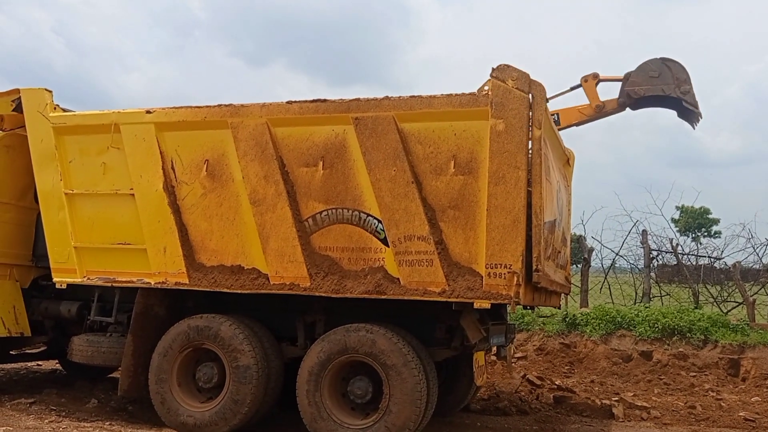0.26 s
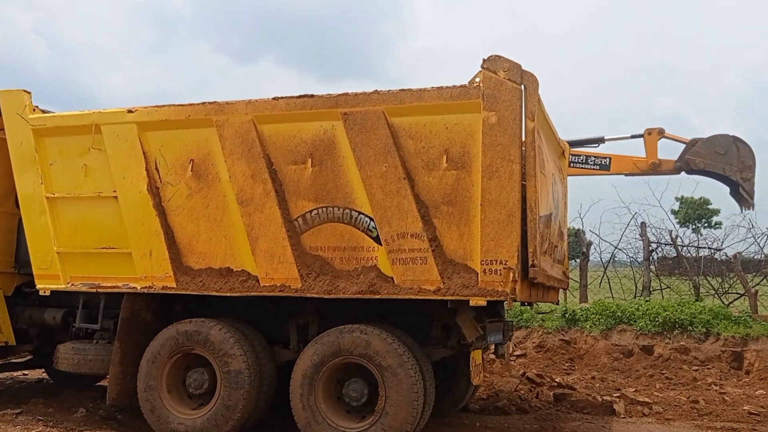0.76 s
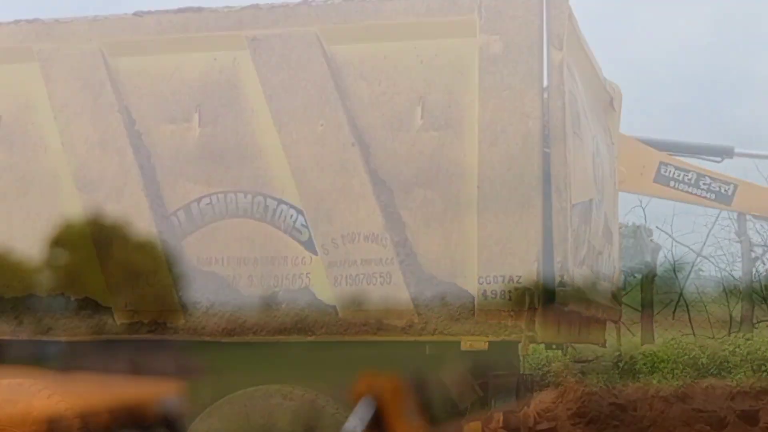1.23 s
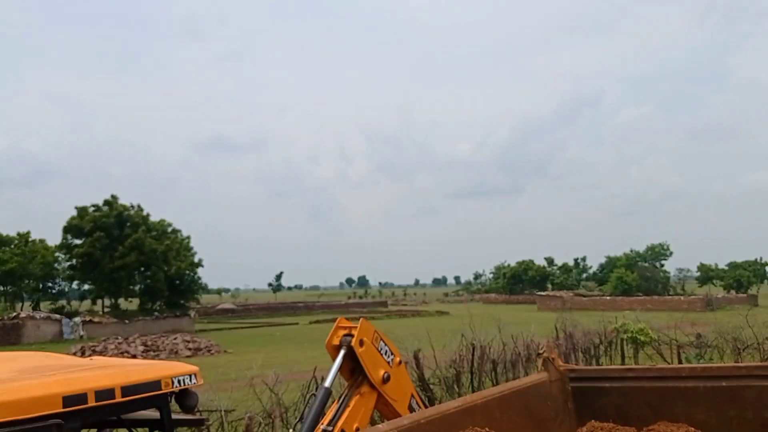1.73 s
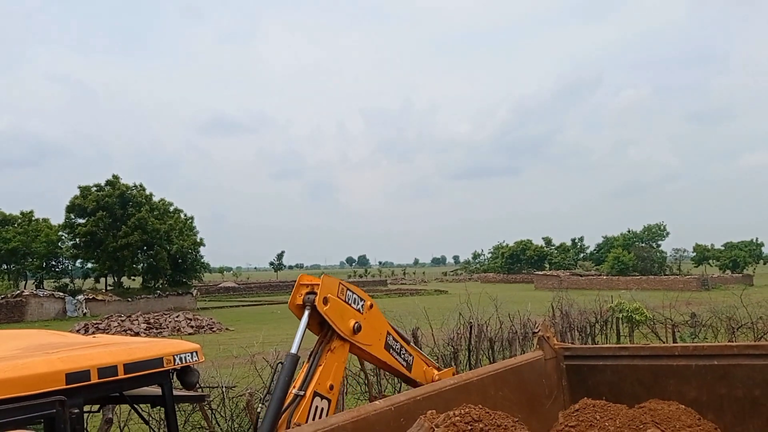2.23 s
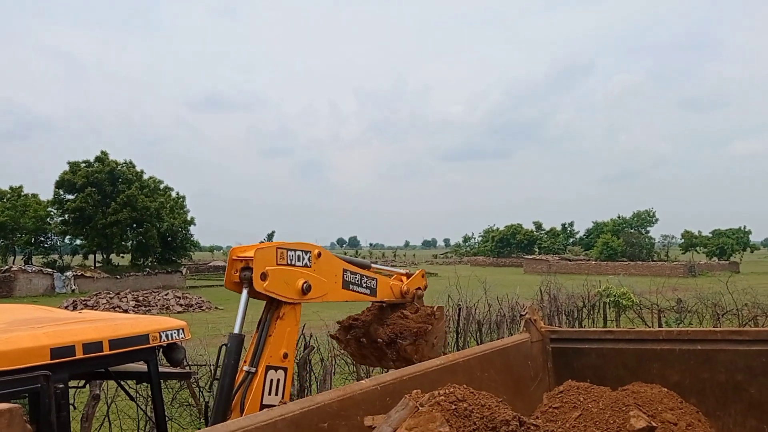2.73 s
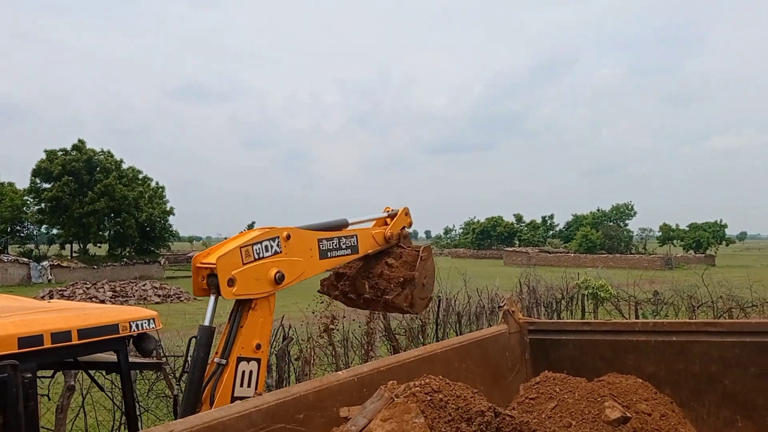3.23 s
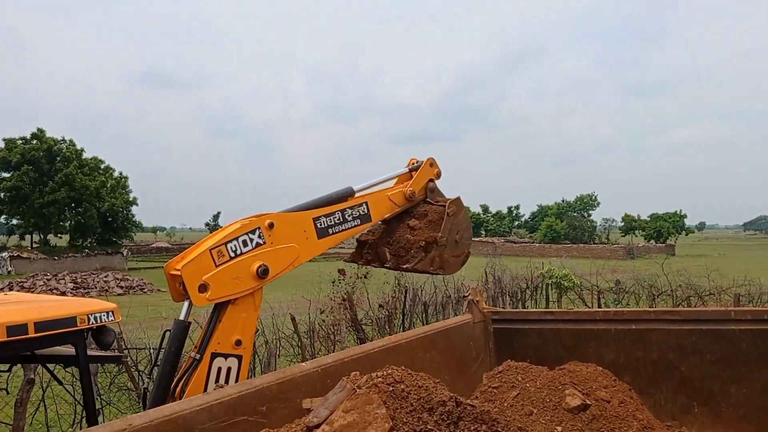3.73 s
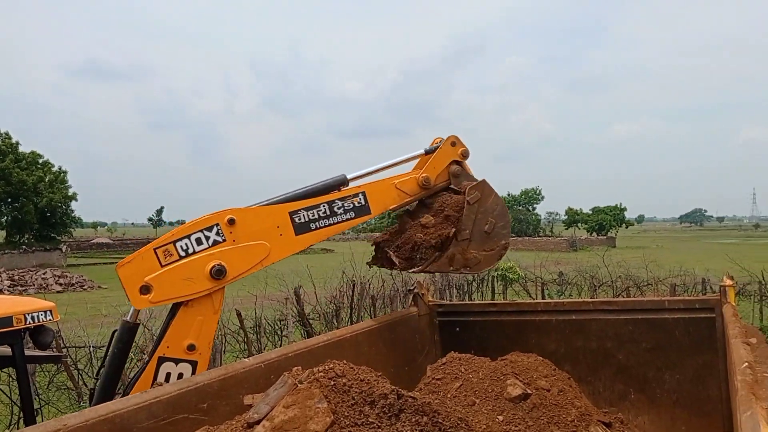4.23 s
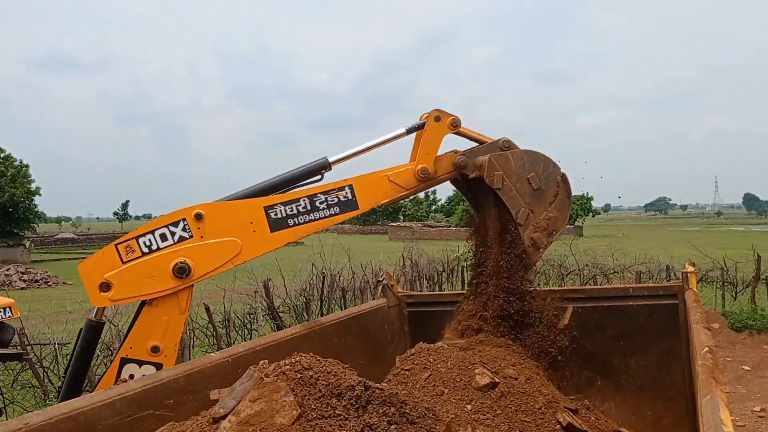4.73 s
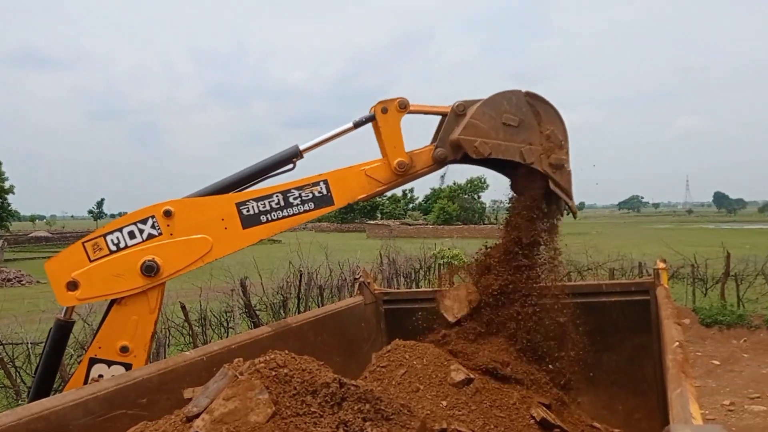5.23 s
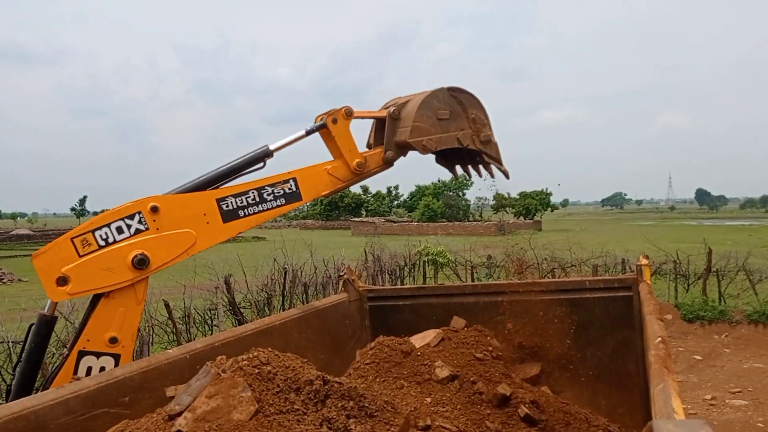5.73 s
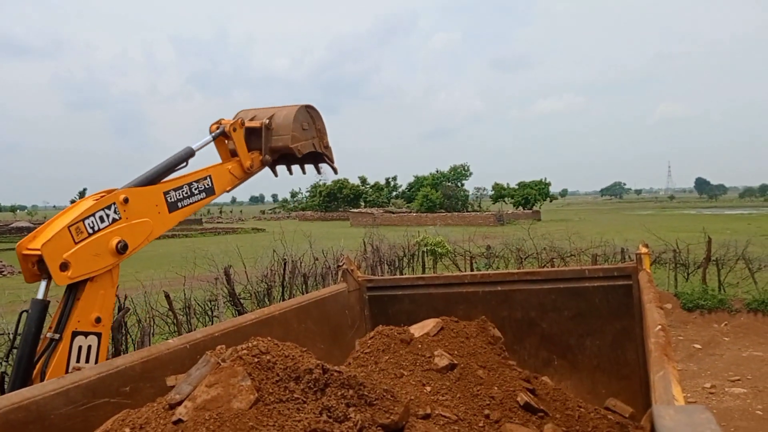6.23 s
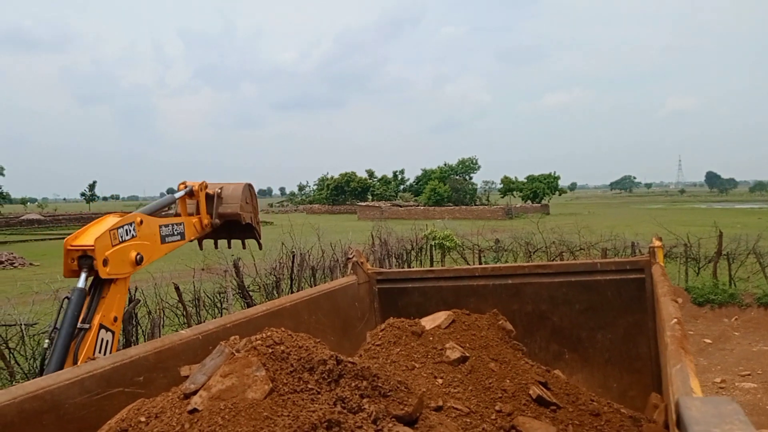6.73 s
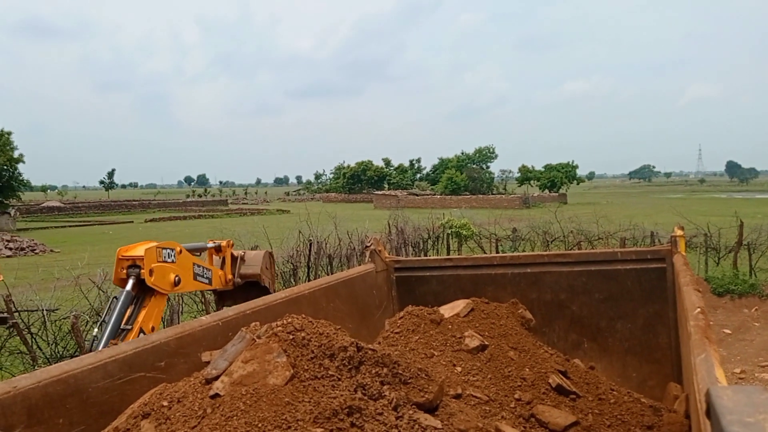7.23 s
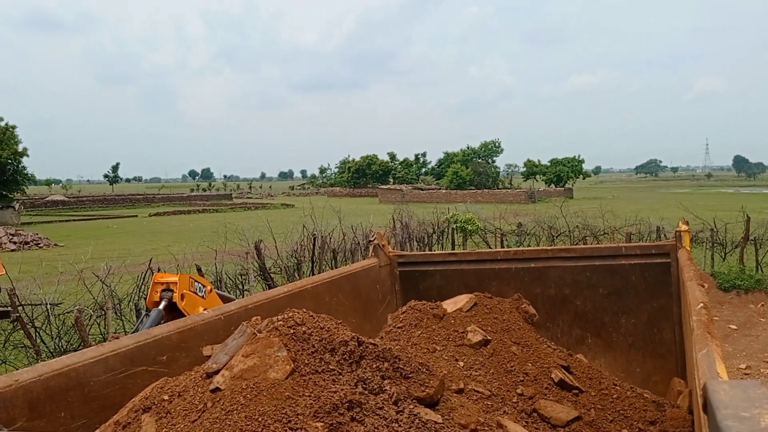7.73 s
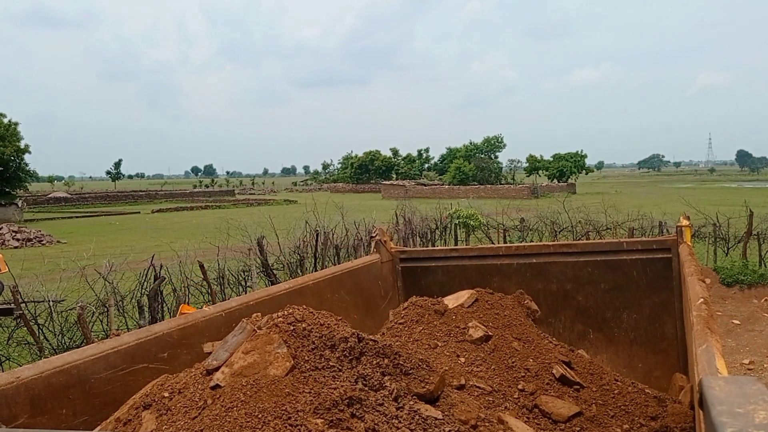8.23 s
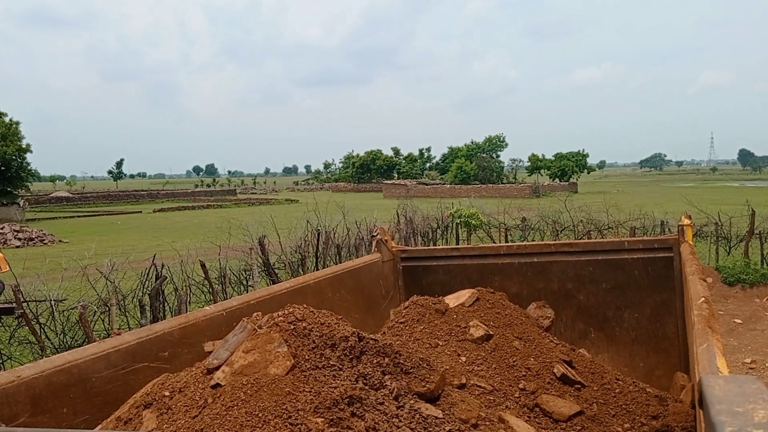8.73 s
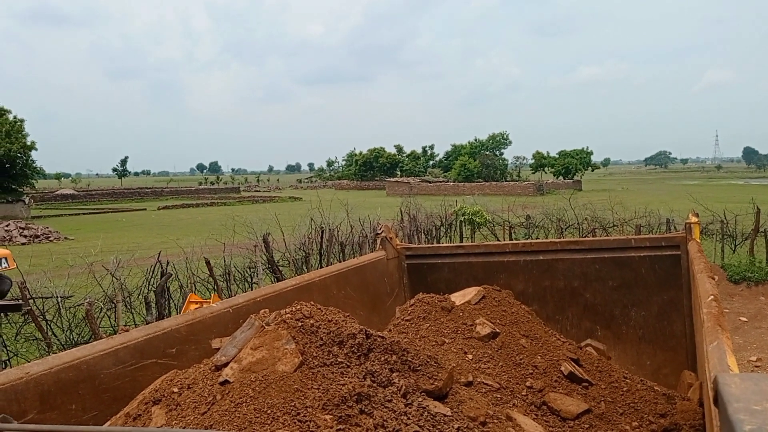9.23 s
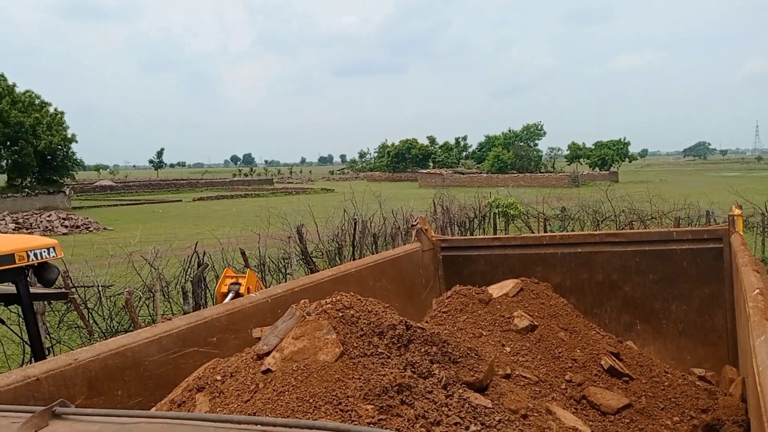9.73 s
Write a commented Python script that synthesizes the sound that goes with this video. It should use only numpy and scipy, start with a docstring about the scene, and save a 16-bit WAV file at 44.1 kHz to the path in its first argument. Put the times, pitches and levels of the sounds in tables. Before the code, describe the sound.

Over a running diesel digger, a metal bucket clanks, then a load of earth and stones tumbles into a tipper truck.

```python
"""An empty bucket clanks over the throb of a four-cylinder diesel: a backhoe is loading a tipper truck.
We listen in open country, first from the ground, then from above the truck body. Each firing in the
engine puffs the exhaust and shakes the steel. The engine labours and oil sings in the valves as the
arm lifts a load. Soil pours, stones and clods thud into the ringing steel body, and the arm swings
back with a few clinks of its linkage."""
import sys
import numpy as np
from scipy import signal
from scipy.fft import rfft, irfft, next_fast_len
from scipy.io import wavfile
from scipy.ndimage import uniform_filter1d, map_coordinates

SR = 44100
rng = np.random.default_rng(int(sys.argv[2]) if len(sys.argv) > 2 else 0)


def log_audio(samples):
    """Write samples as a 16-bit WAV file to the path given in sys.argv[1]."""
    # one column per channel
    frames = np.atleast_2d(samples).T
    # limit to full scale, then quantise
    limited = np.clip(frames, -1, 1)
    pcm = np.round(limited * 32767).astype(np.int16)
    wavfile.write(sys.argv[1], SR, pcm)


N = 439677
TIME = np.arange(N) / SR

# Levels are relative. A fade time is how long a sound takes to fall by 60 dB.
# engine speed, which sags when the hydraulics pull: (time [s], speed [firings per s])
ENGINE_SPEED = [(0, 59.2), (.3, 59.8), (.55, 61.1), (.93, 61.1), (1.05, 58.5), (1.25, 57.4), (1.7, 58.05),
                (2.45, 57.9), (2.67, 57.4), (3.15, 59.4), (3.4, 58.8), (4.5, 59), (4.66, 57.9), (4.9, 59.6),
                (5.08, 58), (5.3, 59.2), (5.65, 58.7), (5.87, 56.6), (6.1, 58.4), (6.7, 61.2), (8.3, 61.1),
                (8.65, 59.7), (9.3, 60.1), (9.97, 59.7)]
# how hard the hydraulics pull: (time [s], load [0-1])
ENGINE_LOAD = [(0, 0.72), (1.1, 0.14), (1.45, 0.83), (2.85, 0.86), (3.15, 0.19), (4.45, 0.6), (4.7, 0.67),
               (5.05, 0.47), (5.7, 0.34), (6, 0.98), (6.3, 0.86), (6.6, 0.05), (9.97, 0.23)]
# where we listen, 1 on the ground behind the truck and 0 above it: (time [s], position [0-1])
BEHIND_TRUCK = [(0, 0.8), (.3, 0.62), (.55, 1), (.97, 1), (1.11, 0.56), (1.3, 0.14), (1.48, 0.02)]
# the four cylinders in firing order: (strength [dB])
CYLINDER_DB = [3.0, -2.5, 0, -1.5]
# wait from each cylinder's firing to its knock: (delay [s])
KNOCK_DELAYS = [.003, .0052, .0037, .006]
# exhaust tones at 1, 2 and 3 times the firing rate, each loudest at its resonance: (top level [dB],
# resonance [Hz], width [Hz], change at full load [dB], change behind the truck [dB])
EXHAUST_TONES = [(-37, 59, 30, 1, -5.5), (-23.7, 116.14, 7.4, 2.3, -14.5), (-20.8, 181, 7.6, -5, -25)]
# the exhaust note's level: a little up at first, then lower, dipping deepest near 1.1 s and 5 s and staying 3
# dB down from 6.1 s on: (time [s], change [dB])
EXHAUST_SAG = [(.6, 1), (.9, -1), (1.1, -3), (1.4, -1.5), (4.8, -1), (5.05, -4), (5.75, -2.5), (6.1, -3)]
# tones of the engine block:
# (pitch [times the firing rate], level [dB], change at full load [dB], change behind the truck [dB])
BLOCK_TONES = [(1.5, -41.5, -3.5, -14), (2.25, -47, -0.5, -29), (2.5, -39, -1.5, -10),
               (2.75, -43.5, -1, -20), (3.25, -42.5, -4.5, -24), (3.5, -48.5, 10, -5), (3.75, -38, 0, -10),
               (4, -54.5, 17, -14), (4.25, -40, -6.5, -22), (4.75, -44.5, 3.5, -26), (5.5, -39, -20, -7),
               (5.75, -38, -17.5, -24), (6, -45.5, 11.5, -19), (6.25, -50, 11.5, -17),
               (6.5, -46.5, 7.5, -27), (7, -46, 5.5, -23), (7.25, -50.5, 5.5, -22.5), (8, -60, 22.5, -18),
               (8.75, -46, -8, -20), (9, -39, -17, -20), (9.25, -39, -2.5, -28), (9.75, -47, 3, -11.5),
               (10, -50, 1, -3), (10.25, -58, 11, -20), (13.75, -59.5, 6, -21), (16, -63.5, 10, -17.5),
               (18, -61.5, 11, -4), (20, -65.5, 10, -21)]
# where the silencer and hood ring: (pitch [Hz], width [Hz], level [dB], change at full load [dB])
HOOD_BANDS = [(201.2, 100, -6.5, 0.5), (282.6, 92, -9, -3.5), (377, 72, -11, 9.5), (433, 195, -14.5, 3.5),
              (574.3, 48, -21, 6.5)]
# tone of the engine's low rumble: (frequency [Hz], level [dB])
RUMBLE_SPECTRUM = [(30, -17), (70, -12.5), (110, -3), (160, 2), (215, -5.5), (290, -16), (380, -4),
                   (490, -10.5), (570, -8), (650, -27.5), (900, -39)]
# tone of the clatter of burning fuel: (frequency [Hz], level [dB])
CLATTER_SPECTRUM = [(450, -7.5), (660, 2), (850, 2), (1100, -7.5), (1450, -8), (1750, -6.5), (2400, -12),
                    (3000, -18.5), (4500, -40.5)]
# tone of the engine's hiss: (frequency [Hz], level [dB])
HISS_SPECTRUM = [(2000, 0), (3200, 4), (4800, 1.5), (6500, -0.5), (7800, -9), (9500, -13.5), (11500, -25.5),
                 (13600, -31.5), (14800, -17), (16000, -22.5)]
# how loud those three noises are: (level at working speed [dB], change at full load [dB],
# change per extra firing per s [dB], change behind the truck [dB])
RUMBLE_DB = (-29.5, 1, 0.54, -11.5)
CLATTER_DB = (-42.5, 0, 0.61, -8)
HISS_DB = (-52.5, 3, 0.48, -9.5)
# where the block rings harder under load: (pitch [Hz], width [Hz], level at full load [dB])
STRAIN_BANDS = [(700, 430, -16), (1094, 294, 4)]
# the engine's roar swells as the arm digs and heaves: (time [s], boost [dB])
ROAR_SWELL = [(.95, 0), (1.12, 2.5), (1.33, 0), (1.52, 1.8), (1.75, .5), (2.08, 1.8), (2.25, 0), (2.65, .5),
              (2.8, 2), (2.98, 3), (3.12, 0)]
# how the engine noise changes behind the truck: (frequency [Hz], width [Hz], change [dB])
TRUCK_SHADOW = [(166, 95, -1.5), (240, 57, 4.5), (393, 180, -7.5), (680, 260, 2.5), (935, 220, -3.5),
                (1800, 410, -11), (7500, 1800, 3.5), (13000, 5000, -9)]

# clanks of bucket and linkage, and a few dull stray knocks in the engine's roar:
# (time [s], level [dB], pitch [Hz], fade time [s])
CLANKS_AND_KNOCKS = [(0.236, -40, 1300, 0.13), (.263, -40.5, 895, 0.18), (.299, -40.5, 1760, 0.58),
                     (.305, -40, 625, 0.2), (.306, -35.5, 1490, 0.092), (0.299, -53, 4800, 0.19),
                     (0.332, -41, 2400, .12), (.358, -50, 5000, .1), (0.346, -33, 1140, 0.11),
                     (.352, -40, 2000, 0.12), (.405, -52, 900, 0.29), (0.782, -48, 1000, 0.045),
                     (1.107, -41, 393, 0.078), (1.457, -34, 620, 0.051), (1.598, -32, 559.7, 0.071),
                     (2.048, -44, 1044, 0.15), (2.908, -43, 1150, 0.1), (6.305, -38, 5000, .12),
                     (6.311, -37, 2300, 0.11), (6.4735, -29.5, 2150, .065), (6.474, -37, 3900, .075),
                     (6.522, -39.5, 1200, 0.09), (6.81, -49, 8000, 0.043), (6.8108, -38.5, 2300, 0.15),
                     (7.661, -46, 1702, 0.33), (8.533, -40, 916, .05), (8.573, -45, 800, .05),
                     (8.648, -41.5, 2020, .26)]
# the arm booms as the empty bucket hits its stop and bounces twice: (time [s], level [dB], pitch [Hz])
ARM_BOOMS = [(.313, -18.5, 182), (0.36, -22, 240), (.411, -27, 263)]
# where the bucket's steel rings: (pitch [Hz], width [Hz], level [dB])
BUCKET_BANDS = [(579, 19, 14.5), (701, 7.6, 18), (820, 81, 4.5), (1052, 8.7, 11), (1050, 240, 7.5),
                (1347, 5.6, 10.5), (1460, 8.3, 7), (1654, 35, 6), (2040, 46, 8.5), (2170, 11, 2),
                (2400, 77, -1), (2700, 16, 8), (3285, 68, 9.5), (4020, 110, 6.5), (6300, 880, -1)]
# stones landing, the smaller the higher: (time [s], level [dB], pitch [Hz], width [Hz], fade time [s])
STONE_HITS = [(4.367, -33.5, 2900, 1700, 0.056), (4.388, -43, 3000, 2000, .12),
              (4.431, -41, 1200, 700, .05), (4.70, -34, 800, 780, .24), (4.703, -40.5, 4380, 2400, 0.14),
              (4.8098, -24.5, 6500, 2400, 0.028), (4.827, -30.5, 1330, 1600, 0.13),
              (4.843, -38.5, 1900, 2210, 0.1), (4.874, -46, 3500, 2400, .05),
              (4.915, -38.5, 6760, 2400, 0.12), (4.927, -32.5, 2700, 2980, 0.17),
              (4.9395, -23, 950, 1300, 0.06), (4.961, -37, 1584, 1800, 0.073),
              (4.997, -48, 3360, 2400, 0.065), (5.022, -42, 4000, 2400, 0.093),
              (5.069, -37, 1000, 600, 0.048), (5.109, -52, 4200, 3000, .05), (5.182, -42, 3220, 2400, .07),
              (5.205, -45, 2600, 1510, .06), (5.268, -42.5, 3200, 2000, .06),
              (5.329, -32.5, 2300, 2980, 0.1), (5.341, -30.5, 900, 1400, 0.15),
              (5.386, -40, 4300, 1800, .04), (5.4535, -23, 1000, 900, 0.019), (5.516, -47, 4000, 2400, .05),
              (5.609, -51, 1030, 600, .04)]
# heavy clods thudding onto the load: (time [s], level [dB], pitch [Hz], fade time [s])
CLOD_HITS = [(4.689, -20.5, 187, 0.53), (4.812, -24, 334, 1), (5.211, -27, 350, .3),
             (5.343, -19.5, 305, 0.14)]
# where the truck body's steel rings: (pitch [Hz], width [Hz], level [dB])
TRUCK_BANDS = [(342, 27, 1), (510, 22, -16), (724, 33, 11), (920, 92, 3.5), (1700, 78, 1), (2210, 86, -2),
               (3207, 110, -4), (5400, 290, 0)]
# parts left ringing by a blow: (time [s], pitch [Hz], level [dB], fade time [s])
RINGING_PARTS = [(.312, 177.7, -22.5, 0.65), (.345, 257, -25, 0.52), (4.695, 164, -15, 0.56),
                 (4.771, 664, -10, 0.078), (4.996, 2230, -34, 0.08), (5.023, 2360, -34, 0.073),
                 (6.521, 2085, -28, .04), (6.522, 2235, -19.5, 0.035), (6.524, 2390, -31, 0.074),
                 (8.647, 2180, -18.5, 0.016), (8.657, 2030, -42, 0.092)]
# soil leaving the bucket: (time [s], level [dB])
SOIL_FLOW = [(4.2, -80), (4.45, -60), (4.62, -47), (4.71, -28.5), (4.8, -41), (4.95, -38), (5.1, -34),
             (5.35, -38), (5.55, -40), (5.8, -70), (6.1, -89)]
# tone of falling grit: (frequency [Hz], level [dB])
GRIT_SPECTRUM = [(200, 18), (600, 13), (1200, -9), (2500, -22.5), (5500, -16), (8000, -18), (12000, -34),
                 (15500, -27.5)]
# pebbles bouncing among the soil: (time [s], rate [pebbles per s])
PEBBLE_RATE = [(4.3, 0), (4.62, 40), (4.72, 220), (4.95, 300), (5.35, 200), (5.7, 0)]
# the linkage rattles as the arm pulls back: (time [s], level [dB])
RATTLE_SWELL = [(5.6, -70), (5.82, -48), (6.04, -40), (6.25, -52), (6.45, -58), (6.6, -76)]
# tone of that rattle: (frequency [Hz], level [dB])
RATTLE_SPECTRUM = [(250, -6.5), (450, 7.5), (800, 1.5), (1600, 6.5), (2500, -10), (4000, -9), (7000, -11.5),
                   (11000, -31), (15500, -31)]
# chirps of a pivot pin: (time [s], level [dB], pitch [Hz])
PIN_CHIRPS = [(2.41, -50, 5050), (2.686, -47, 5450)]
# where the oil sings:
# (pitch [Hz], width [Hz], level from the ground [dB], level from above at full load [dB])
OIL_BANDS = [(622, 10, -67, -62), (1150, 39, -82, -68), (2230, 150, -61.5, -65.5), (2650, 160, -65, -75),
             (2900, 260, -73, -55), (3275, 50, -65.5, -72.5), (3850, 70, -73, -85.5), (4100, 90, -71, -85),
             (5260, 260, -89, -62.5)]


def engine(working_speed=59):
    """A diesel fires about 59 times a second; its tones and noises all keep time with those firings."""
    speed = curve(ENGINE_SPEED)
    load, ground = curve(ENGINE_LOAD), curve(BEHIND_TRUCK)
    firing = np.cumsum(speed * (1 + .0009 * drift(14))) / SR  # running count of firings
    rumble_gain, clatter_gain, hiss_gain = (
        from_db(db + load_db * load + speed_db * (speed - working_speed) + ground_db * ground)
        for db, load_db, speed_db, ground_db in (RUMBLE_DB, CLATTER_DB, HISS_DB))
    rumble = colour(vibration(firing, share=.38) * throb(firing, depth=.76, fall=1.5), RUMBLE_SPECTRUM)
    clatter = colour(vibration(firing, share=.55) * throb(firing, depth=.27, fall=2.2), CLATTER_SPECTRUM)
    hiss = colour(vibration(firing, share=.35) * throb(firing, depth=.22, fall=6.7), HISS_SPECTRUM)
    surge = from_db(2.5 * drift(16))
    clatter += load * surge * ring_through(clatter, STRAIN_BANDS)
    roar = from_db(curve(ROAR_SWELL))
    low = roar * rumble_gain * (from_db(-3) * rumble + hood_thumps(firing, load))
    high = roar * clatter_gain * clatter + hiss_gain * hiss
    noise = low + reflections(high)
    shadow = sum((from_db(db) - 1) * resonance(noise, hz, width) for hz, width, db in TRUCK_SHADOW)
    tones = exhaust(firing, speed, load, ground) + block_hum(firing, load, ground)
    return tones + noise + ground * shadow + linkage_rattle(firing)


def exhaust(firing, speed, load, ground):
    """Three low tones peak together in one puff; each swells as the speed brings it to a resonance."""
    puff = 0
    for multiple, (db, hz, width, load_db, ground_db) in enumerate(EXHAUST_TONES, 1):
        swell = 1 / np.hypot(1, 2 * (multiple * speed - hz) / width)
        gain = from_db(db + load_db * load + ground_db * ground)
        puff += swell * gain * np.cos(2 * np.pi * multiple * firing)
    return np.sqrt(2) * puff * from_db(curve(EXHAUST_SAG) + .5 * drift(18))


def block_hum(firing, load, ground):
    """Unequal cylinders make the block hum at quarter multiples of the firing rate, wavering a little."""
    crank = firing + .003 * drift(12)
    tones = 0
    for multiple, db, load_db, ground_db in BLOCK_TONES:
        phase = 2 * np.pi * (multiple * crank + rng.random()) + .12 * drift(6)
        gain = from_db(db + load_db * load + ground_db * ground + 1.5 * drift(6))
        tones += gain * np.cos(phase)
    return np.sqrt(2) * tones


def hood_thumps(firing, load, scatter_cycles=.3, spread_db=2.4):
    """Every firing knocks the silencer and hood, never twice with quite the same strength or delay."""
    fired = np.flatnonzero(np.diff(np.floor(firing)))
    count = len(fired)
    strength_db = np.resize(CYLINDER_DB, count) + rng.normal(0, 1.4, count)
    thumps = 0
    for hz, width, db, load_db in HOOD_BANDS:
        delay_s = np.resize(KNOCK_DELAYS, count) + rng.normal(0, scatter_cycles / hz, count)
        starts = np.clip(fired + (delay_s * SR).astype(int), 0, N - 1)
        kicks = np.zeros(N)
        kicks[starts] = from_db(np.minimum(strength_db + rng.normal(0, spread_db, count), 6))
        ring = resonance(resonance(kicks, hz, width), hz, width)
        thumps += from_db(db + load_db * load) * rms_one(ring)
    return thumps


def vibration(firing, share, size=2940):
    """Engine shaking: one share repeats with each round of the cylinders, the rest is fresh noise."""
    cylinders = len(CYLINDER_DB)
    harmonics = np.exp(2j * np.pi * rng.random(size // 2 + 1))
    # leave gaps where the exhaust and block have their own tones
    harmonics[cylinders * np.arange(len(EXHAUST_TONES) + 1)] = 0
    harmonics[[round(cylinders * row[0]) for row in BLOCK_TONES]] = 0
    place_in_round = (firing / cylinders) % 1 * size
    repeated = map_coordinates(rms_one(irfft(harmonics)), [place_in_round], order=3, mode="grid-wrap")
    return np.sqrt(share) * repeated + np.sqrt(1 - share) * rng.standard_normal(N)


def throb(firing, depth, fall):
    """Each cylinder gives a push of its own strength that fades until the next one fires."""
    strength = from_db(CYLINDER_DB)[firing.astype(int) % len(CYLINDER_DB)]
    push = strength * np.exp(-fall * (firing % 1))
    return 1 - depth + depth * rms_one(uniform_filter1d(push, size=30))


def clanks_and_booms():
    """Knocks ring through the bucket's steel; the arm booms three times under the opening clank."""
    knocks = sum(burst(s, db, hz, width_hz=.7 * hz, rise_s=.0028, fade_s=fade, rough_db=3)
                 for s, db, hz, fade in CLANKS_AND_KNOCKS)
    knocks += sum(burst(s, db, hz, width_hz=.27 * hz, rise_s=.0027, fade_s=.17, rough_db=-3)
                  for s, db, hz in ARM_BOOMS)
    return from_db(-1.5) * knocks + ring_through(knocks, BUCKET_BANDS)


def stones_and_clods():
    """Stones crack and soft clods thud; both ring through the truck body."""
    hits = sum(burst(s, db, hz, width, rise_s=.0015, fade_s=fade, rough_db=4)
               for s, db, hz, width, fade in STONE_HITS)
    hits += sum(burst(s, db, hz, width_hz=.47 * hz, rise_s=2.6 / hz, fade_s=fade, rough_db=-3)
                for s, db, hz, fade in CLOD_HITS)
    return from_db(-1) * hits + ring_through(hits, TRUCK_BANDS)


def ringing_steel(rise_s=.003):
    """Some blows leave a single steel part ringing with one pure, fading tone."""
    tones = 0
    for s, hz, db, fade_s in RINGING_PARTS:
        age = np.clip(TIME - s, 0, 1)
        loudness = from_db(db - 60 * age / fade_s) * (1 - np.exp(-age / rise_s))
        tones += loudness * np.sin(2 * np.pi * hz * age)
    return tones


def pouring_soil(grains_per_s=3000, spread_db=3.8):
    """Countless grains of uneven size patter on the heap."""
    sizes = from_db(spread_db * np.minimum(rng.exponential(1, N), 5)) * rng.choice([-1, 1], N)
    lands = rng.random(N) < grains_per_s / SR
    return from_db(curve(SOIL_FLOW)) * colour(sizes * lands, GRIT_SPECTRUM)


def pebbles(width_hz=220, size_count=14):
    """Each pebble clacks briefly at a pitch set by its size."""
    lands = rng.random(N) < curve(PEBBLE_RATE) / SR
    clicks = lands * from_db(rng.uniform(-12, 0, N))
    sizes = rng.integers(0, size_count, N)
    clacks = sum(resonance(clicks * (sizes == size), hz, width_hz) * (hz / 1000) ** -.6
                 for size, hz in enumerate(np.geomspace(750, 5800, size_count)))
    boost = SR / (2 * np.pi * width_hz)  # a narrow band keeps only a little of each click
    return from_db(-30) * boost * soften(clacks, order=2, hz=6500)


def linkage_rattle(firing):
    """As the arm pulls back, every firing shakes a loose part."""
    taps = throb(firing, depth=.85, fall=4.5) * from_db(2 * drift(30))
    return from_db(curve(RATTLE_SWELL)) * colour(taps * rng.standard_normal(N), RATTLE_SPECTRUM)


def pin_squeaks():
    """A dry pivot pin chirps as the loaded bucket curls."""
    return sum(burst(s, db, hz, width_hz=340, rise_s=.013, fade_s=.18, rough_db=-1)
               for s, db, hz in PIN_CHIRPS)


def singing_oil():
    """Oil rushing through the valves sings in a few narrow bands, each coming and going on its own."""
    flow = rng.standard_normal(N)
    ground = curve(BEHIND_TRUCK)
    pull = curve(ENGINE_LOAD) * (1 - ground)
    song = 0
    for hz, width, ground_db, pull_db in OIL_BANDS:
        band = rms_one(resonance(flow, hz, width) * from_db(3 * drift(22)))
        song += (ground * from_db(ground_db) + pull * from_db(pull_db)) * band
    return song


def reflections(sound, count=5):
    """Quick echoes off the hood, ground and truck ripple the tone; their delays wander slightly."""
    delays_s = rng.uniform(.002, .016, count)
    echoes = sum(np.interp(TIME - delay - 4e-5 * drift(.5), TIME, sound) for delay in delays_s)
    return .96 * sound + .12 * echoes


def burst(start_s, db, hz, width_hz, rise_s, fade_s, rough_db, size=26000):
    """Many tiny contacts make a burst of noise around one pitch that rises fast and fades steadily."""
    track, age, start = np.zeros(N + size), TIME[:size], int(start_s * SR)
    low_hz = np.hypot(hz, width_hz / 2) - width_hz / 2
    edges_hz = np.clip([low_hz, low_hz + width_hz], 20, .45 * SR)
    band = signal.butter(1, edges_hz, "band", fs=SR, output="sos")
    contacts = rng.standard_normal(size)
    contacts *= from_db(rough_db * np.repeat(rng.standard_normal(size), repeats=40)[:size])
    noise = signal.sosfilt(np.vstack([band, band]), contacts)
    noise /= np.sqrt(uniform_filter1d(noise ** 2, size=900) + 1e-12)  # even out the slower swells
    loudness = from_db(db - 60 * age / fade_s) * np.minimum(age / rise_s, 1)
    track[start:start + size] = loudness * noise
    return track[:N]


def resonance(sound, hz, width_hz):
    """Let a sound ring at one pitch; the narrower the width, the longer it rings."""
    decay = np.exp(-np.pi * width_hz / SR)
    feedback = [1, -2 * decay * np.cos(2 * np.pi * hz / SR), decay ** 2]
    return signal.lfilter(np.array([1, 0, -1]) * (1 - decay ** 2) / 2, feedback, sound + 1e-18)


def ring_through(sound, bands):
    """A steel part rings at several pitches at once."""
    return sum(from_db(db) * resonance(sound, hz, width) for hz, width, db in bands)


def colour(sound, spectrum):
    """Shape a sound's lows and highs, dropping 24 dB an octave past the table's ends; strength 1."""
    hz, db = np.transpose(spectrum)
    size = next_fast_len(N)
    octave = np.log2(np.arange(size // 2 + 1) * SR / size + 1)
    outside = np.abs(octave - np.clip(octave, np.log2(hz[0]), np.log2(hz[-1])))
    gain = from_db(np.interp(octave, np.log2(hz), db) - 24 * outside)
    return rms_one(irfft(rfft(sound, size) * gain, size)[:N])


def soften(sound, order, hz):
    """Turn down the treble above hz."""
    return signal.sosfilt(signal.butter(order, hz, fs=SR, output="sos"), sound)


def drift(turns_per_s):
    """A slow random wander, about 1 in size."""
    points = rng.standard_normal(4000)
    return rms_one(np.interp(TIME * turns_per_s, np.arange(len(points)), points))


def curve(rows):
    """Join (time, value) points with straight lines."""
    return np.interp(TIME, *np.transpose(rows))


def from_db(db):
    """Turn decibels into a multiplier."""
    return 10 ** (np.asarray(db) / 20)


def rms_one(sound):
    """Scale to an average strength (rms) of 1."""
    return sound / np.sqrt(np.mean(sound ** 2) + 1e-20)


def scene(echo_s=.019):
    """Engine, oil, soil and blows, with a dull echo of the blows off the truck wall."""
    hits = clanks_and_booms() + stones_and_clods() + ringing_steel() + pin_squeaks() + pebbles()
    echo = from_db(-12) * soften(np.interp(TIME - echo_s, TIME, hits), order=1, hz=3000)
    return (engine() + singing_oil() + pouring_soil() + hits + echo)[None]


def record(dry, fade_in_s=.004, ceiling=.42, cutoff_hz=15600):
    """The sound fades in quickly, its highest peaks are rounded and the very top treble is cut."""
    fade_in = np.minimum(TIME / fade_in_s, 1)
    rounded = dry / (1 + (dry / ceiling) ** 6) ** (1 / 6)
    return signal.sosfilt(signal.ellip(10, .1, 80, cutoff_hz, fs=SR, output="sos"), fade_in * rounded)


dry = scene()
out = record(dry)
log_audio(out)
```